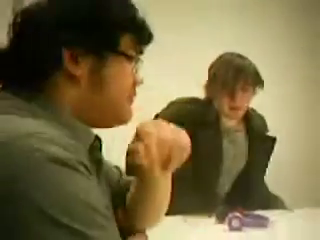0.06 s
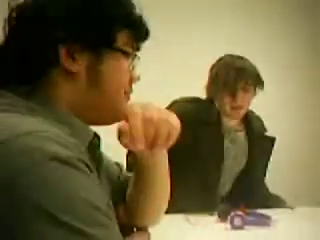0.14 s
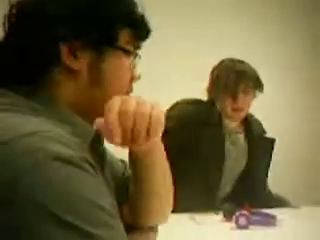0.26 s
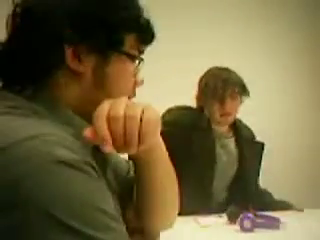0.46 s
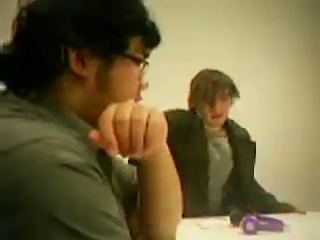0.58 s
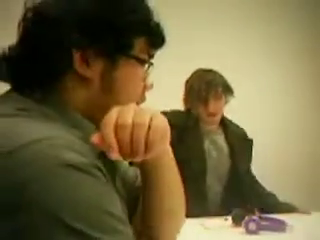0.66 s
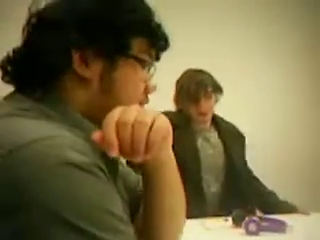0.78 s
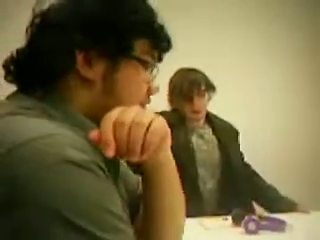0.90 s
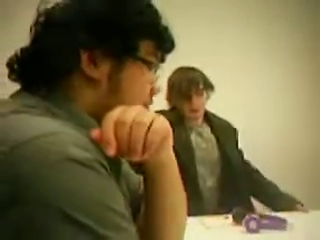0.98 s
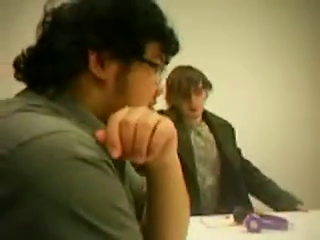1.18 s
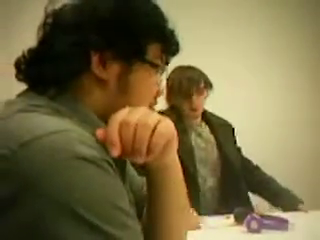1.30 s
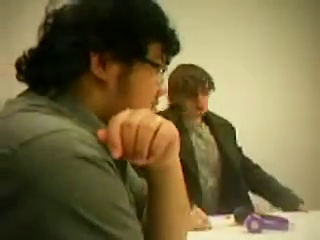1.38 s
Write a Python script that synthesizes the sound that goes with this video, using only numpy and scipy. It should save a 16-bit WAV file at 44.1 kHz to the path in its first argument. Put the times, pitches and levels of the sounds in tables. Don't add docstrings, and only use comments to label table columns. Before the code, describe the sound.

Close, lo-fi and narrow-band: a die cracks onto a hard tabletop, clatters with shrinking bounces and settles, the bare walls echoing; dim airy hum behind, and finally a faint tap, cloth drag and thin squeak.

```python
import sys
import numpy as np
from scipy import signal
from scipy.fft import rfft, irfft
from scipy.io import wavfile
from scipy.ndimage import uniform_filter1d

SR = 44100
rng = np.random.default_rng(int(sys.argv[2]) if len(sys.argv) > 2 else 0)


def wrap_up_sound(samples):
    columns = np.atleast_2d(samples).T
    tamed = np.clip(columns, -1, 1)
    steps = np.round(tamed * 32767).astype(np.int16)
    wavfile.write(sys.argv[1], SR, steps)


def voltage_ratio(decibels):
    exponent = np.asarray(decibels, float) / 20
    return 10 ** exponent


N = 63945
PLACES = 4


def at_hz(points, hz):
    known_hz, level = np.transpose(points)
    return np.interp(np.log(hz), np.log(known_hz), level)


def in_time(rows):
    return np.interp(np.arange(N) / SR, *np.transpose(rows))


def rms_one(x):
    return x / np.sqrt(np.mean(x ** 2) + 1e-20)


def band_pass(x, low_hz, high_hz):
    return signal.sosfilt(signal.butter(2, [low_hz, high_hz], "band", fs=SR, output="sos"), x)


def ring(clicks, hz, t60):
    r = voltage_ratio(-60 / (t60 * SR))
    w = 2 * np.pi * hz / SR
    return signal.lfilter([0, np.sin(w)], [1, -2 * r * np.cos(w), r * r], clicks + 1e-18)


def drift(rate_hz):
    r = np.exp(-2 * np.pi * rate_hz / SR)
    return rms_one(signal.lfilter([1], [1, -2 * r, r * r], rng.standard_normal(N + SR))[SR:])


def bands(spectrum, gain, source):
    edges = 30 * 2 ** np.arange(0, 7.6, 0.5)
    total = 0
    for k, (low, high) in enumerate(zip(edges, edges[1:])):
        middle = np.sqrt(low * high)
        band = band_pass(source[k % 2], low, high)
        total = total + voltage_ratio(at_hz(spectrum, middle)) * gain(middle) * band
    return total


# start in seconds, peak level in dB,
# pitch of the click in Hz, time to its peak in seconds.
HITS = [(0.2457, -1.5, 2950, 0.00036), (0.2479, 0.5, 1792, 0.0014), (0.29, -5, 2650, 0.00025),
        (.2906, -2.5, 1500, 0.00051), (.3632, -2.5, 2742, 0.00044), (0.3714, -15, 1500, 0.0018),
        (.4499, -10.5, 1500, 0.00077), (0.4556, -2.18, 2600, 0.00045), (0.5221, -15.5, 2200, 0.00035),
        (0.5242, -9.5, 1500, 0.00064), (.5832, -12, 1604, 0.0014), (.6480, -13.5, 1574, 0.0011),
        (.6872, -15.5, 1870, 0.00047), (.7380, -15.5, 1920, 0.00037), (.8030, -21.5, 1500, 0.0011),
        (0.813, -31.5, 2200, .002), (0.618, -19.5, 1410, 0.0022)]


def strikes():
    crack_db, crack_hz, crack_t60_s = -20.5, 3400, 0.011
    touch_db, skip_s, skip_loss_db = -6, 0.0008, -0.5
    grit_share = 0.65
    length = SR // 10
    t = np.arange(length) / SR
    out, touches = np.zeros(N), np.zeros((PLACES, N))
    luck = rng.random((len(HITS), 3))
    grit = band_pass(rng.standard_normal((len(HITS), length)), 700, 3200)
    for k, (start, db, hz, rise) in enumerate(HITS):
        skip_times = skip_s * (np.arange(3) + 0.6 * luck[k] * [0, 1, 1])
        skips = np.zeros(length)
        skips[(skip_times * SR).astype(int)] = voltage_ratio(db - skip_loss_db * np.arange(3)) * [1, -1, 1]
        i = int(start * SR)
        touches[k % PLACES, i:i + length] += voltage_ratio(touch_db) * skips
        swell = t / rise * np.exp(1 - t / rise)
        click = voltage_ratio(db) * swell * (np.sin(2 * np.pi * hz * t) + grit_share * grit[k])
        out[i:i + length] += click + voltage_ratio(crack_db) * ring(skips, crack_hz, crack_t60_s)
    return out, touches


# time in seconds, level in dB.
TUMBLE = [
    (.5, -64.5),
    (.6, -34.5),
    (.75, -33),
    (.82, -35),
    (.84, -39),
    (.915, -39),
    (.95, -53.5),
    (1.0, -66),
]


def tumble():
    touches_per_s = 700
    sizes = voltage_ratio(1.5 * np.minimum(rng.exponential(1, N), 2)) * rng.choice([-1, 1], N)
    return sizes * (rng.random(N) < touches_per_s / SR) * voltage_ratio(in_time(TUMBLE))


# frequency in Hz, level in dB, time to fall 60 dB in seconds.
MODES = [(291, -9.5, 0.17), (503, -17, 0.19), (589, -9.5, 0.3), (843, -3.5, 0.18), (1010, -0.5, 0.042),
         (1252, 8.5, 0.035), (1500, -1, 0.08), (1877.5, 8, 0.068), (2200, -11, 0.066), (2800, -17.5, 0.013),
         (3540, -9, 0.049)]


def table(touches):
    modes_db, thump_db, thump_hz, thump_t60_s = -25, -18.5, 187, 0.056
    landing = 1.0 * (np.arange(N) == int(HITS[0][0] * SR))
    out = voltage_ratio(thump_db) * ring(landing, thump_hz, thump_t60_s)
    for hz, db, t60 in MODES:
        out += voltage_ratio(modes_db + db) * ring(touches * rng.uniform(0.44, 3.4, N), hz, t60)
    return out


# frequency in Hz, level in dB per Hz.
ROOM_COLOUR = [(60, -23), (150, -11), (400, -10.5), (600, -8.5), (900, -4), (1600, -1), (2600, -2.5),
               (4500, -8)]
# frequency in Hz, time to fall 60 dB in seconds.
ROOM_T60 = [(150, 0.9), (500, 0.96), (1500, 0.69), (4000, 0.71)]


def room(touches):
    early_db, early_t60_s, late_db, first_wall_s = -0.5, 0.13, -10, 0.0076
    t = np.arange(N) / SR

    def die_away(hz):
        early = voltage_ratio(early_db - 60 * t / early_t60_s)
        return early + voltage_ratio(late_db - 60 * t / at_hz(ROOM_T60, hz))

    echoes = bands(ROOM_COLOUR, die_away, rng.standard_normal((2, PLACES, N)))
    echoes = echoes * np.clip(t / first_wall_s, 0, 1) ** 2
    return signal.fftconvolve(touches, echoes, axes=1)[:, :N].sum(axis=0)


# frequency in Hz, level in dB per Hz.
CLOTH = [(100, -30), (250, -9.5), (500, -2), (800, -9), (1900, -3), (2800, -13), (4500, -9.5)]


def drag():
    cloth_db, cloth_start_s, cloth_attack_s, grains_per_s = -37.5, 1.271, 0.0097, 6300
    squeak_db, squeak_hz, squeak_start_s, squeak_rise_s, wobble_rad = -48, 3174, 1.30, 0.03, 0.7
    tap_s, tap_db, low_db = 1.2735, -36, -38.5
    t = np.arange(N) / SR

    sizes = rng.standard_normal((2, N)) * voltage_ratio(2.3 * rng.exponential(1, (2, N)))
    grains = sizes * (rng.random((2, N)) < grains_per_s / SR)
    cloth = rms_one(bands(CLOTH, lambda hz: voltage_ratio(2.3 * drift(24)), grains + 1e-18))
    cloth = cloth * np.clip((t - cloth_start_s) / cloth_attack_s, 0, 1)

    tone = np.sqrt(2) * np.sin(2 * np.pi * squeak_hz * t + wobble_rad * drift(14))
    squeak = voltage_ratio(4.4 * drift(27)) * tone * np.clip((t - squeak_start_s) / squeak_rise_s, 0, 1)

    touch = 1.0 * (np.arange(N) == int(tap_s * SR))
    tap = voltage_ratio(tap_db) * (ring(touch, 416, 0.072) + ring(touch, 1600, 0.0036))
    tap = tap + voltage_ratio(low_db) * ring(touch, 70, 0.052)
    return voltage_ratio(cloth_db) * cloth + voltage_ratio(squeak_db) * squeak + tap


# frequency in Hz, level in dB per Hz.
AIR = [(30, -1), (60, -5.5), (160, 1.5), (300, 0), (480, -1.5), (900, -4.5), (2000, -7.5), (4500, -10)]
# time in seconds, level in dB.
AIR_SWELL = [
    (0, 6),
    (.2, 4.5),
    (.9, -2.5),
    (1.05, 1),
    (1.45, 1),
]
# frequency in Hz, rms level in dB.
HUM = [
    (221, -64),
    (428, -66),
    (452, -58),
    (657, -59),
]


def air():
    rush_db = -44
    t = np.arange(N) / SR
    rush = rms_one(bands(AIR, lambda hz: voltage_ratio(1.5 * drift(3.3)), rng.standard_normal((2, N))))
    hum = np.zeros(N)
    for hz, db in HUM:
        hum += np.sqrt(2) * voltage_ratio(db + 1.5 * drift(12)) * np.sin(2 * np.pi * hz * t + drift(6))
    return voltage_ratio(in_time(AIR_SWELL)) * (voltage_ratio(rush_db) * rush + hum)


def scene():
    clicks, touches = strikes()
    rolling = tumble()
    place = rng.integers(0, PLACES, N)
    touches = touches + rolling * (place == np.arange(PLACES)[:, None])
    clicks = clicks + ring(rolling, 1700, 0.0033) + voltage_ratio(-5.5) * ring(rolling, 2800, 0.0046)
    return (clicks + table(touches.sum(axis=0)) + room(touches) + drag() + air())[None]


def following_hiss(x):
    hiss_db, follow_s, low_hz = -13, 0.0015, 200
    loudness = uniform_filter1d(np.abs(x), max(1, int(follow_s * SR)), axis=1)
    high_pass = signal.butter(1, low_hz, "high", fs=SR)
    hiss = signal.lfilter(*high_pass, loudness * rng.standard_normal(N))
    return voltage_ratio(hiss_db) * np.sqrt(SR / 8000) * hiss


# start in seconds, end in seconds, offset at start, offset at end.
SLIPS = [
    (0.246, .432, -0.073, -0.037),
    (.432, 0.556, -.004, -0.0068),
    (0.558, .684, -.012, -0.017),
    (.684, 0.737, -0.015, 0.0075),
    (0.757, .94, -0.013, -.009),
    (.94, 1.32, -.001, -.001),
    (1.313, 1.46, -0.0082, 0.0081),
]


def zero_line():
    t = np.arange(N) / SR
    offset = np.zeros(N)
    for a, b, start, end in SLIPS:
        offset += ((t >= a) & (t < b)) * (start + (end - start) * (t - a) / (b - a))
    return offset


def band_limit(x):
    edge_hz, width_hz, edge_db, power = 3506, 1060, -40, 2.66
    hz = np.arange(N + 1) * SR / (2 * N)
    over = np.maximum(hz - edge_hz, 0) / width_hz
    loss = voltage_ratio(edge_db * np.minimum(over, 3) ** power)
    return irfft(rfft(x, 2 * N) * loss, 2 * N)[:, :N]


def top_cut(x):
    return signal.sosfilt(signal.butter(12, 16600, fs=SR, output="sos"), x)


def record(dry):
    overload = 0.70
    x = band_limit(dry + following_hiss(dry) + zero_line())
    mix = np.clip(x, -overload, overload)
    return top_cut(mix)


dry = scene()
out = record(dry)
wrap_up_sound(out)
```